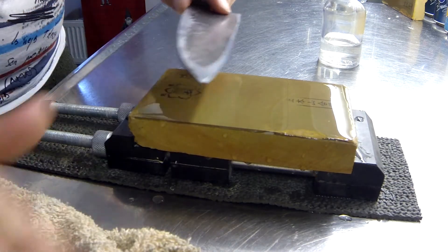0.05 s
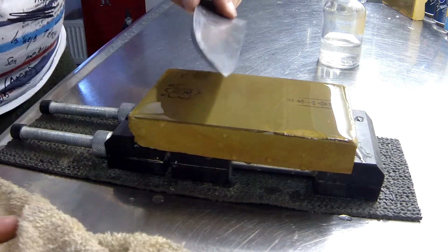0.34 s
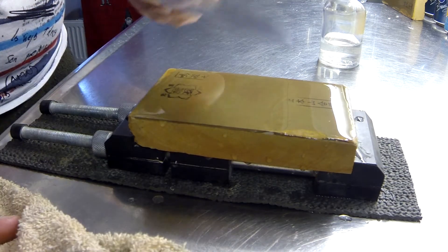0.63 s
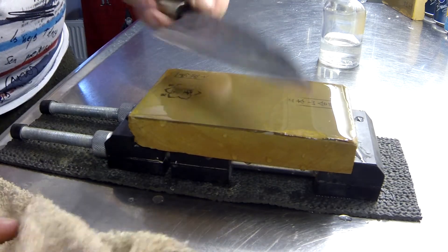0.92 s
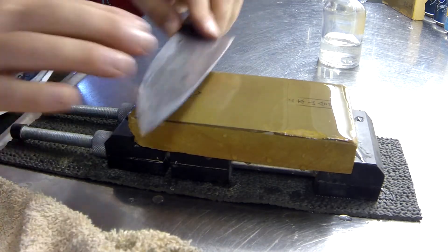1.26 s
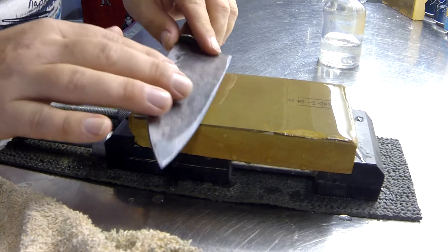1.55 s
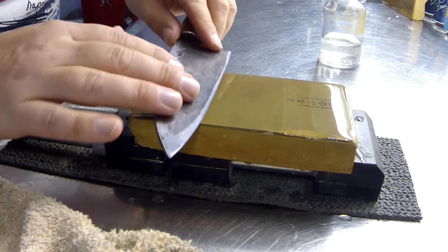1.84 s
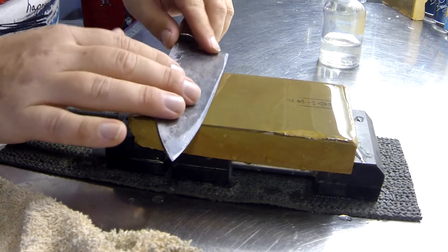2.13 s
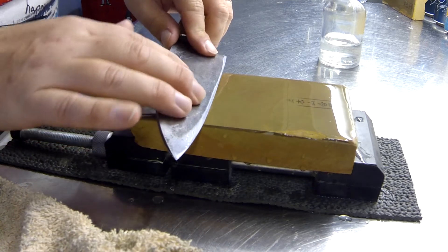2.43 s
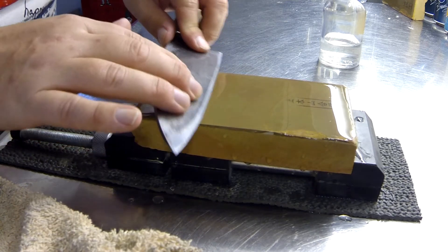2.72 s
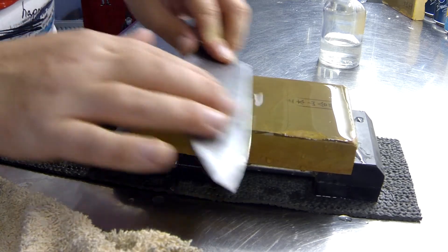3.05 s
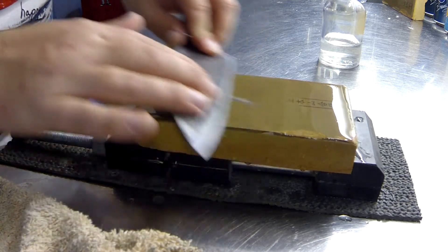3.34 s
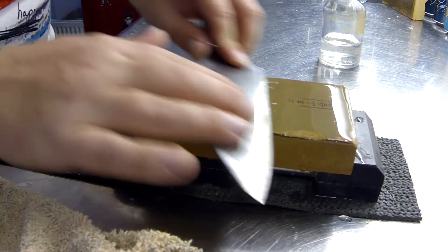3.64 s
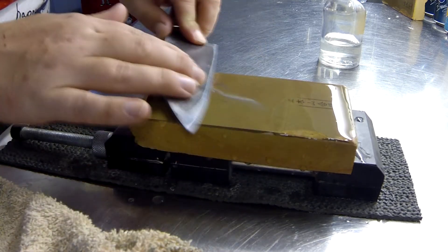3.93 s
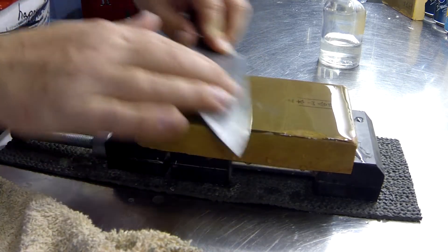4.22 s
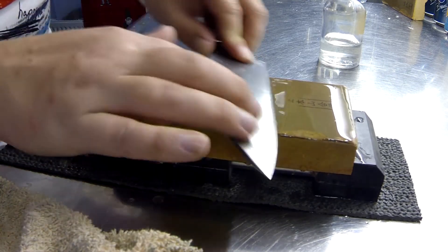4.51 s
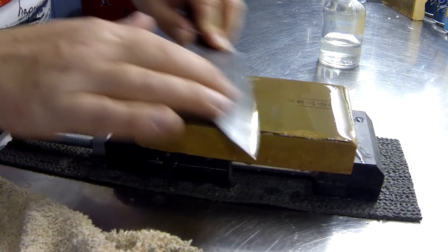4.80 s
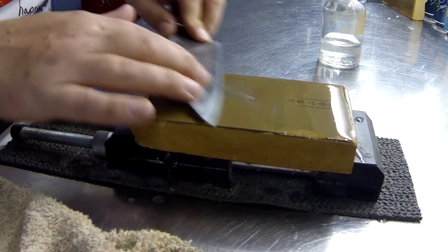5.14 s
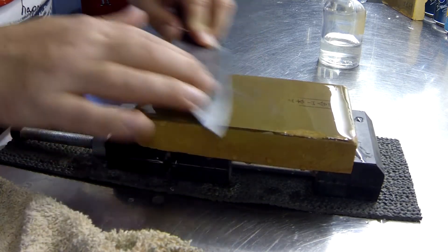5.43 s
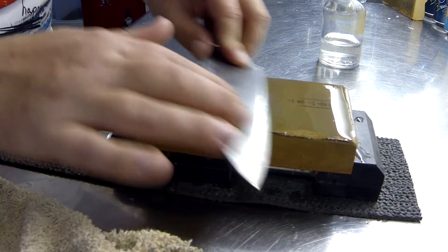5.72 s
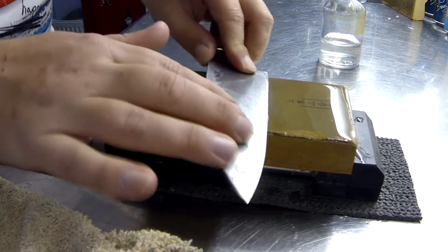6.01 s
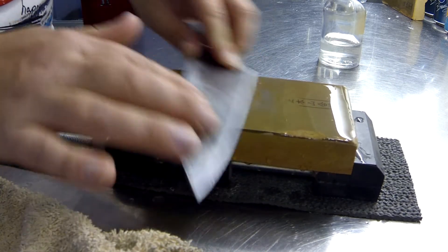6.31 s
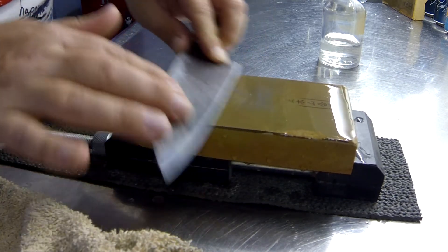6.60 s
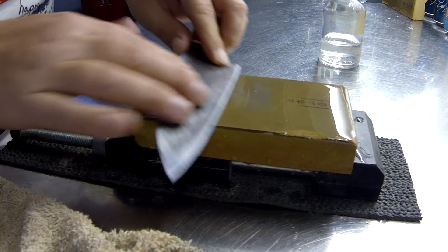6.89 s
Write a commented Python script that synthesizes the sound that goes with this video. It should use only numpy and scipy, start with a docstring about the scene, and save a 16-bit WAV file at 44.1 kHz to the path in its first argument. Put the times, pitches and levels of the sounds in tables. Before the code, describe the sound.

A knife clacks onto a wet whetstone, then slides back and forth with faint scrapes and ticks over a steady low rumble.

```python
"""Knife on a wet whetstone

A small room, one microphone close to a steel bench. A kitchen knife is settled on the stone with one
sharp, ringing clack, then slid to and fro with light pressure. The edge hisses on the grit, squeaks
thinly, ticks and twice scrapes harder; the flat drags through slurry and the bench sways with the arms.
The walls answer softly, and a machine rumbles steadily behind it all."""
import sys
import numpy as np
from scipy import signal
from scipy.fft import rfft, irfft, next_fast_len
from scipy.io import wavfile
from scipy.ndimage import map_coordinates

SR = 44100
rng = np.random.default_rng(int(sys.argv[2]) if len(sys.argv) > 2 else 0)


def master_out(mix):
    """Clip the mix to full scale and print it as 16-bit PCM to the path in sys.argv[1]."""
    frames = np.transpose(np.atleast_2d(mix))
    ceiling = np.clip(frames, -1, 1)
    pcm = np.round(ceiling * 32767).astype(np.int16)
    wavfile.write(sys.argv[1], SR, pcm)


N = 315565

START_S, ATTACK_S, EASE_S, RELEASE_S = 2.52, 0.4, 6.62, 0.77  # the sharpening builds, holds, eases off
STROKE_HZ, TURN_S = 2.68, 5.06  # to-and-fro rate; one moment when the blade turns into a push
PUSH_DB = 1  # lift in mid push, dip in mid pull

# The edge gliding on fine grit, heard close: frequency_hz, relative_db
GLIDE_SPECTRUM = [(1000, -55), (2700, 0), (3270, 8.5), (3600, -12), (4130, 4.5), (4500, 1), (5400, 1.5),
                  (6100, -11), (7400, -4.5), (8850, 2), (9900, -15), (10800, -2.5), (12000, -23),
                  (15000, -21)]
# The flat of the blade dragging through slurry: frequency_hz, relative_db
DRAG_SPECTRUM = [(250, 6.5), (350, 16.5), (480, 4.5), (810, 3), (1080, -4), (1230, 7.5), (1500, -17),
                 (1850, 6), (2300, -3), (2700, -15), (4000, -13), (9000, -100)]
# The slow shudder of the bench under the stone: frequency_hz, relative_db
BENCH_SPECTRUM = [(10, -31), (19, 1), (31, -3.5), (42, -11), (60, -5), (110, -18), (300, -43.5),
                  (900, -120)]


def strokes():
    """The blade glides on grit and drags through slurry, while the arms rock the bench."""
    elapsed_s, travel = np.arange(N) / SR - START_S, velocity()
    sway = amp(-43 + 0.9 * elapsed_s) * coloured(rng.standard_normal(N), BENCH_SPECTRUM)
    glide_gain = amp(-75.5 + PUSH_DB * travel + 1.2 * wobble(40))
    glide = glide_gain * coloured(grit(spread_db=13), GLIDE_SPECTRUM)
    lean_db = 2.5 * elapsed_s  # the drag grows as the hands lean in
    turn_db = 1 - 2 * travel ** 2  # and swells at each turn
    catching = amp(1.7 * wobble(45))
    drag = amp(-69 + lean_db + turn_db) * catching * coloured(grit(spread_db=9.5), DRAG_SPECTRUM)
    return effort() * (sway + glide + drag)


# Where the edge bites into the stone: start_s, length_s, level_db
BITES = [(5.9, 0.093, -71), (6.176, 0.16, -57.5), (6.40, .06, -71), (6.515, 0.17, -55.5),
         (6.685, 0.088, -71)]
# The force of coarse grains on the edge: frequency_hz, relative_db
GRAIN_SPECTRUM = [(400, -4), (1200, 4.5), (3200, 6.5), (5400, -1), (9000, 3), (13800, -3), (15200, -9)]
# Modes of the blade held against the stone: pitch_hz, width_hz, relative_db
BLADE_MODES = [(1210, 70, 2), (1700, 80, -3), (1800, 60, -4), (1980, 70, -2), (2290, 140, -2),
               (2520, 50, -4), (2805, 50, -5), (3020, 55, -2), (3230, 80, 0), (3885, 65, 1), (4110, 55, -5),
               (5260, 220, -6), (5555, 50, -10), (6990, 150, -15), (8600, 1300, -16), (10700, 600, -18),
               (13750, 600, -19)]


def scrapes():
    """Coarse grains excite the blade's modes: faintly all along, strongly where the edge bites."""
    pressure = effort() * amp(-80.5 + PUSH_DB * velocity())
    for start_s, length_s, db in BITES:
        add(pressure, start_s, amp(db) * swell(length_s) ** 2)
    grains = coloured(grit(spread_db=3) * amp(2.0 * wobble(160)), GRAIN_SPECTRUM)
    modes = lambda hz: sum(amp(db) * resonance(hz, pitch, width) for pitch, width, db in BLADE_MODES)
    ring = unit(filtered(grains, modes))
    rasp = amp(-5) * filtered(grains, lambda hz: resonance(hz, centre_hz=3200, width_hz=3500) ** 2)
    return pressure * unit(ring + rasp)


# Clear notes of the rubbed steel: pitch_hz, width_hz, level_db
RUBBED_NOTES = [(3245, 130, -76.5), (4110, 60, -83.5)]


def steel():
    """The rubbed blade rings in two narrow notes under a grainy sheen, a little louder on each push."""
    notes = sum(amp(db + 1.5 * wobble(7.4)) * band(hz, width, N) for hz, width, db in RUBBED_NOTES)
    sheen_gain = amp(-83 + 2.5 * wobble(9) + 2.5 * wobble(120))
    sheen = sheen_gain * band(centre_hz=8800, width_hz=1100, size=N)
    return effort() * amp(PUSH_DB * velocity()) * (notes + sheen)


# Modes of knife, stone and holder; the close ones near 2.2 kHz beat: pitch_hz, relative_db, t60_s
CLACK_RING = [(195, -12, .17), (275, -8.5, .15), (365, -16, .22), (415, -9, .1), (470, -5, .085),
              (522, -13, .09), (572, -10, .12), (720, -16, .12), (1029, -15.5, .09), (1320, -9, .025),
              (1846, -16, .06), (2063, 1, .054), (2215, 4.8, .052), (2290, -6, .03), (2518, -13, .05),
              (3010, -16, .05), (3330, -16, .025), (3850, -24, .115), (4100, -31, .16), (6080, -37, .06),
              (8330, -30, .025)]
# The crack of steel meeting stone: frequency_hz, relative_db
CRACK_SPECTRUM = [(120, -6), (400, 3), (900, -5), (2200, -1), (2900, -7), (3900, -5), (5200, -26),
                  (8500, -38), (12000, -58)]


def clack(start_s=1.9557, gain_db=-27.5):
    """The blade is settled with one hard contact: a crack, a beating metallic note and duller modes."""
    out, t = np.zeros(N), np.arange(SR // 3) / SR
    ring = sum(amp(db - 60 * t / t60) * np.sin(2 * np.pi * hz * t) for hz, db, t60 in CLACK_RING)
    crack = amp(-6 - 60 * t / .06) * coloured(rng.standard_normal(len(t)), CRACK_SPECTRUM)
    attack = 1 - np.exp(-t / .001)
    add(out, start_s, amp(gain_db) * attack * (ring + crack))
    return out


# Thin zings off the blade: start_s, length_s, level_db, pitch_hz, width_hz
BLADE_ZINGS = [(6.22, .075, -68.5, 5400, 250), (6.39, .08, -68, 3260, 200), (5.92, .07, -71, 8700, 1400),
               (6.56, .055, -64, 5530, 80), (6.585, .055, -60.5, 5280, 80), (6.59, .04, -64, 3900, 90),
               (6.72, .12, -67.5, 3260, 200), (6.83, .24, -70, 3260, 200)]


def zings():
    """The blade sings briefly under a hard bite and on the last strokes."""
    return friction(BLADE_ZINGS)


# Thin squeaks at the edge: start_s, first_catch_db, second_catch_db
EDGE_SQUEAKS = [(3.68, -66.5, -66), (4.639, -63.5, -66.5), (5.295, -66, -78), (6.739, -64, -64)]
# The two catches of a squeak, one narrow, one hoarser: delay_s, pitch_hz, width_hz, t60_s
SQUEAK_CATCHES = [(0, 8150, 360, 0.32), (.12, 8500, 1050, 0.31)]


def squeaks():
    """The edge catches twice, sings high and raggedly for a moment, and fades."""
    out, t = np.zeros(N), np.arange(SR // 4) / SR
    attack = 1 - np.exp(-t / 0.003)
    for start_s, *levels in EDGE_SQUEAKS:
        for db, (delay_s, hz, width, t60) in zip(levels, SQUEAK_CATCHES):
            note = band(hz, width, len(t))
            hiss = amp(-1 - 60 * t / .3) * band(centre_hz=5200, width_hz=3600, size=len(t))
            add(out, start_s + delay_s, amp(db - 60 * t / t60) * attack * (note + hiss))
    return out * amp(-.5 + 2.6 * wobble(130))


# Ticks of blade and holder, mostly where a stroke turns: start_s, gain_db, pitch_hz, t60_s
TICK_CONTACTS = [(1.203, -47, 1150, 0.05), (1.434, -48, 400, 0.043), (4.496, -50, 890, 0.06),
                 (4.513, -50, 2200, .04), (4.8795, -45.5, 1750, 0.024), (4.8895, -45.5, 600, 0.04),
                 (4.935, -44, 660, 0.034), (5.069, -50, 1600, .035), (5.102, -47, 1300, .05),
                 (5.260, -51, 1210, 0.038), (5.441, -52, 850, 0.05), (5.630, -44.5, 850, 0.048),
                 (5.6885, -49.5, 700, 0.028), (5.807, -51, 1000, 0.05), (5.987, -50, 1090, 0.045),
                 (6.046, -50, 750, .04), (6.331, -49, 900, .05), (6.490, -51, 1190, 0.05),
                 (6.5255, -50, 600, 0.035), (6.5435, -39, 680, 0.048), (6.553, -46, 450, .05),
                 (6.684, -47, 380, .08), (6.709, -47, 750, 0.05)]
# Uneven partials of a tick, the higher dying sooner: pitch_ratio, relative_db
TICK_RING = [(.62, -9), (1, -2), (1.57, -6), (2.41, -10)]


def ticks(cutoff_hz=2500):
    """Small dead contacts: a dull ring, a click of steel on stone and a little splash of slurry."""
    out, t = np.zeros(N), np.arange(SR // 8) / SR
    attack = 1 - np.exp(-t / .0003)
    for start_s, gain_db, hz, t60 in TICK_CONTACTS:
        decay_db = 60 * t / t60
        ring = sum(amp(db - ratio * decay_db) * np.sin(2 * np.pi * ratio * hz * t)
                   for ratio, db in TICK_RING)
        splash = amp(-6 - decay_db) * band(centre_hz=hz, width_hz=hz, size=len(t))
        click = amp(-8 - 60 * t / .03) * band(centre_hz=1800, width_hz=1200, size=len(t))
        add(out, start_s, amp(gain_db) * attack * (ring + splash + click))
    return signal.sosfilt(signal.butter(3, cutoff_hz, fs=SR, output="sos"), out)


# Soft handling at the bench: start_s, length_s, level_db, centre_hz, width_hz
HAND_RUBS = [(.2, 0.26, -67.5, 1840, 900), (.95, 0.16, -59, 260, 150), (1.71, 0.096, -63, 1500, 700),
             (2.72, 0.33, -57.5, 240, 106), (3.72, 0.054, -61, 1390, 350), (4.33, 0.22, -54, 342, 85),
             (4.34, 0.19, -62.5, 790, 70), (4.505, 0.03, -60.5, 2370, 250), (4.92, 0.13, -55.5, 338, 70),
             (5.08, 0.028, -59, 1300, 400), (5.735, 0.052, -59, 1450, 450), (6.22, 0.071, -59.5, 2080, 700)]


def rubs():
    """Fingers, handle and stone holder rub as the hands shift the knife."""
    return friction(HAND_RUBS)


# The clack coming back to the microphone off the walls: delay_s, gain_db
WALL_ECHOES = [(.033, -27), (.055, -20.5), (.074, -28), (.103, -24.5), (.134, -33), (.160, -31),
               (.225, -39)]


def echoes(hit):
    """Hard surfaces throw the clack's note back in scattered bursts, so that it flutters."""
    out = np.zeros(N)
    for delay_s, db in WALL_ECHOES:
        add(out, delay_s, amp(db) * hit)
    flutter = amp(-2 + 3.8 * wobble(260))
    return flutter * filtered(out, lambda hz: resonance(hz, centre_hz=2170, width_hz=200) ** 2)


# How long the small room rings around the bench: frequency_hz, t60_s
ROOM_DECAY = [(200, 0.59), (2200, 0.45), (4000, 0.78), (10000, 0.088)]


def room(x, delay_s=0.0078):
    """The near walls answer with a diffuse tail; the highest treble dies first."""
    hz, t, noise = signal.stft(rng.standard_normal(SR // 2), SR, nperseg=256)
    decay = amp(-60 * t / along(ROOM_DECAY, hz)[:, None])
    tail = signal.istft(noise * decay, SR, nperseg=256)[1]
    delayed = np.pad(x, (int(delay_s * SR), 0))
    return signal.fftconvolve(delayed, tail / np.linalg.norm(tail))[:N]


# The machine's rumble in the background: frequency_hz, relative_db
RUMBLE_SPECTRUM = [(8, -24), (20, -43), (44, -11.5), (56, -5), (76, -5), (89, -17.5), (101, -0.5),
                   (112, -2.5), (122, -7.5), (137, -7.5), (176, -21), (200, -21), (245, -33.5),
                   (1000, -120)]
# The air of the room: frequency_hz, relative_db
AIR_SPECTRUM = [(150, -7), (280, 3), (360, 2.5), (470, -3.5), (780, -4), (950, -8), (1500, -11),
                (2600, -12), (3150, -11.5), (4500, -21), (8000, -24.5), (12700, -32), (13800, -30),
                (15200, -42)]
# The machine's faint tones: pitch_hz, level_db
HUM_TONES = [(100, -46.5), (320, -64), (378, -91), (638, -82.5), (806, -73.5), (1221, -76)]


def machine():
    """A running machine fills the room with steady rumble and wavering tones, over a soft rush of air."""
    t = np.arange(N) / SR
    rumble = amp(-41.0) * coloured(rng.standard_normal(N), RUMBLE_SPECTRUM)
    air = amp(-59.5) * coloured(rng.standard_normal(N), AIR_SPECTRUM)
    tones = sum(amp(db + 2.0 * wobble(3.7)) * np.sin(2 * np.pi * hz * t + 1.1 * wobble(7))
                for hz, db in HUM_TONES)
    return rumble + air + tones


def effort():
    """How hard the arms work, 0-1: attack, hold, release."""
    t = np.arange(N) / SR
    return np.clip((t - START_S) / ATTACK_S, 0, 1) * np.clip(1 - (t - EASE_S) / RELEASE_S, 0, 1)


def velocity():
    """The blade's travel: +1 in mid push, -1 in mid pull, 0 at the turns."""
    return np.sin(2 * np.pi * STROKE_HZ * (np.arange(N) / SR - TURN_S))


def grit(spread_db):
    """Countless tiny collisions with grains of unequal size, none of them very large."""
    return unit(rng.standard_normal(N) * amp(spread_db * np.minimum(rng.standard_normal(N), 2.6)))


def friction(spells):
    """Short spells of friction, each ringing in one resonance."""
    out = np.zeros(N)
    for start_s, length_s, db, hz, width in spells:
        pressure = swell(length_s)
        add(out, start_s, amp(db) * pressure * band(hz, width, len(pressure)))
    return out


def swell(length_s):
    """Pressure that rises and lets go."""
    return np.sin(np.linspace(0, np.pi, int(length_s * SR)))


def resonance(hz, centre_hz, width_hz):
    """Response of one damped mode."""
    return 1j * hz * width_hz / (centre_hz ** 2 - hz ** 2 + 1j * hz * width_hz)


def band(centre_hz, width_hz, size):
    """Noise of rms 1 ringing in one steep-sided resonance."""
    response = lambda hz: resonance(hz, centre_hz, width_hz * np.pi / 2) ** 2
    return unit(filtered(rng.standard_normal(size), response))


def coloured(x, spectrum):
    """x shaped by the given spectrum, at rms 1."""
    return unit(filtered(x, lambda hz: amp(along(spectrum, hz))))


def filtered(x, response):
    """x through a complex frequency response."""
    size = next_fast_len(len(x) + 8192)
    return irfft(rfft(x, size) * response(np.fft.rfftfreq(size, 1 / SR)), size)[:len(x)]


def along(points, hz):
    """Interpolate (frequency_hz, value) points on a log frequency axis."""
    frequencies, values = np.transpose(points)
    return np.interp(np.log(hz + 1), np.log(frequencies + 1), values)


def wobble(rate_hz):
    """A smooth random curve with rate_hz knots a second."""
    knots = rng.standard_normal(int(N * rate_hz / SR) + 4)
    return map_coordinates(knots, [np.arange(N) * rate_hz / SR])


def amp(db):
    """Decibels to gain."""
    return 10 ** (np.asarray(db) / 20)


def unit(x):
    """x at rms 1."""
    return x / np.sqrt(np.mean(x ** 2) + 1e-20)


def add(track, start_s, sound):
    """Mix a sound into the track at start_s."""
    part = track[round(start_s * SR):][:len(sound)]
    part += sound[:len(part)]


def scene():
    """The knife work up close, with the walls and the machine behind it."""
    hit = clack()
    small_sounds = scrapes() + zings() + squeaks() + rubs() + ticks()
    knife = strokes() + steel() + hit + echoes(hit) + small_sounds
    reverb = room(amp(-16.5) * hit + amp(-15) * small_sounds)
    return (knife + reverb + machine())[None]


def record(dry):
    """One microphone by the bench, keeping nothing above 15.2 kHz."""
    return filtered(dry[0], lambda hz: hz < 15200)[None]


dry = scene()
out = record(dry)
master_out(out)
```